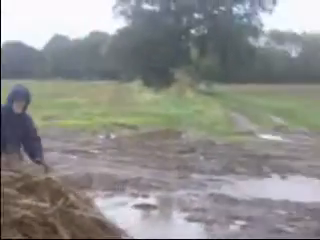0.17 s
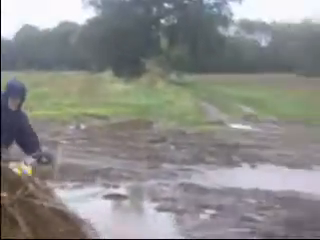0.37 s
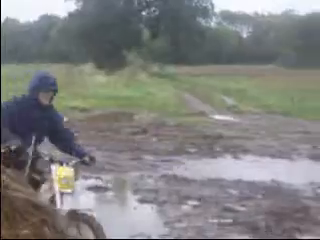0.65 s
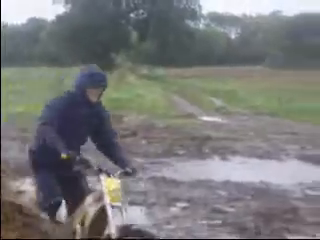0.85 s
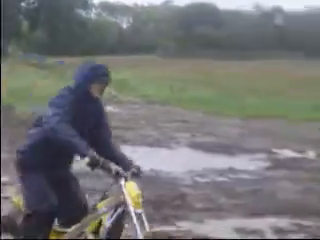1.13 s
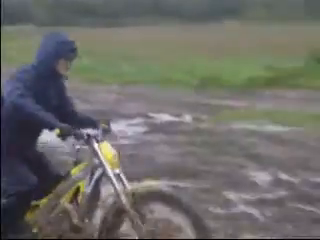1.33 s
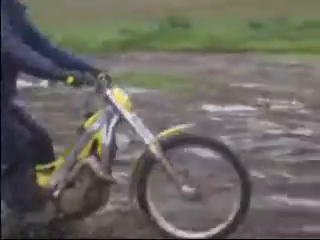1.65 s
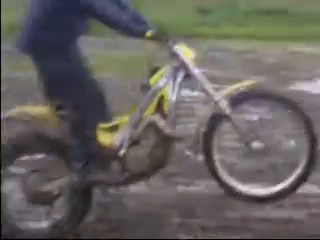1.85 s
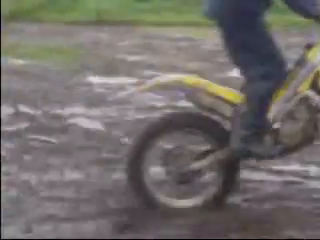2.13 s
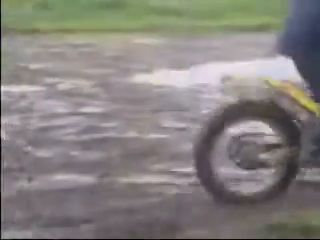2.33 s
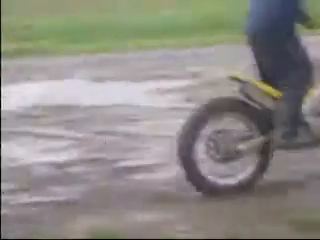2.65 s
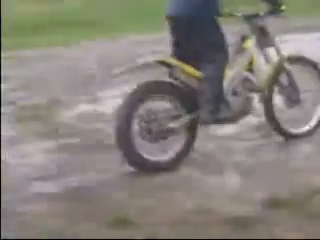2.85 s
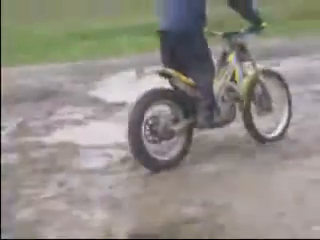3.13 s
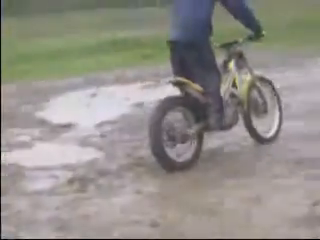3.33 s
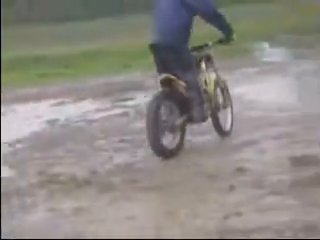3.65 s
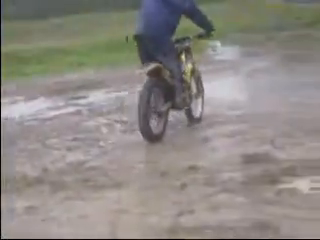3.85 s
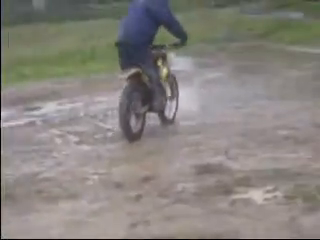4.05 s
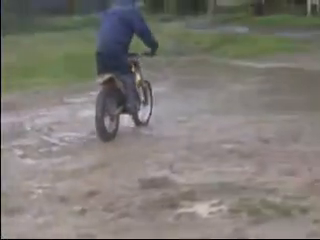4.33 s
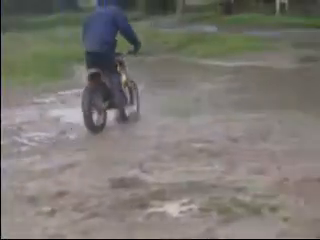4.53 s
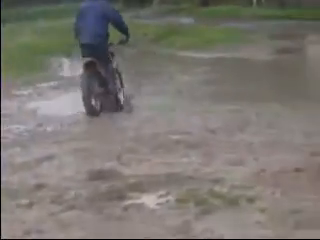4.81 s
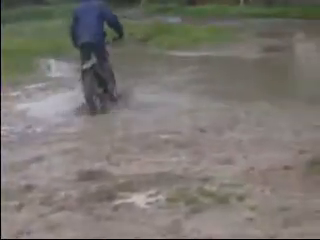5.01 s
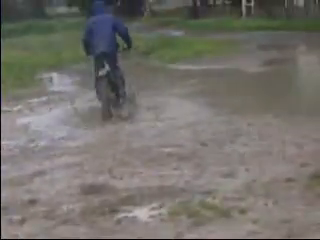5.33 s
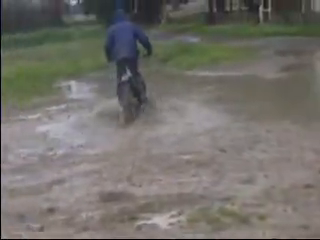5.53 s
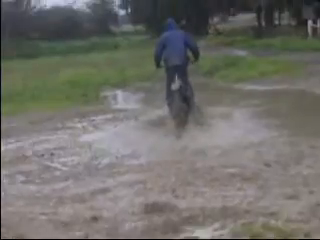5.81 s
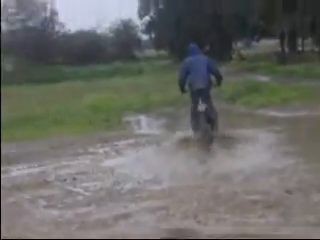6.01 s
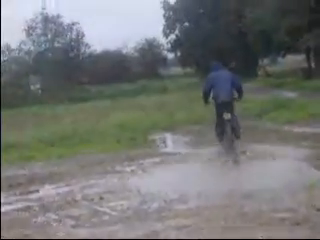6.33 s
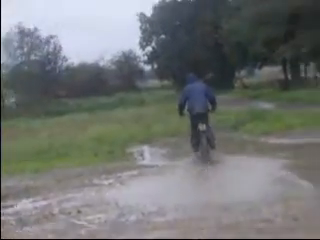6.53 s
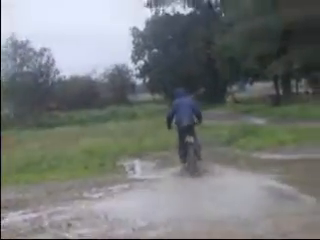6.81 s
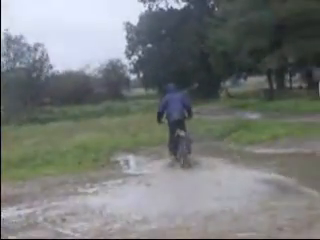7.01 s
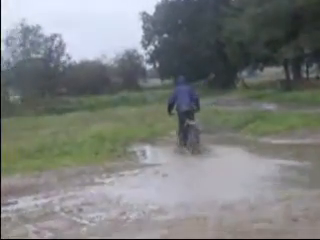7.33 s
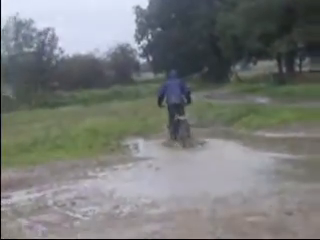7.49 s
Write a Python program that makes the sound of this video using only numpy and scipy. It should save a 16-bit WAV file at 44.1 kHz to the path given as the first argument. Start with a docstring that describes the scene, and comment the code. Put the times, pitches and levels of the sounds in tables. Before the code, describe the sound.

Outdoors on muddy open ground, a small two-stroke motorcycle approaches with a buzzy, hollow exhaust bark, eases briefly, then cracks open and revs harder as it passes very close, wet tyres hissing. The throttle shuts and heavy wind thumps, crackles and whistles over the microphone, overloading it. Farther away the engine pops sparsely, ticks over quickly through a faintly splashing puddle, then gives a few last pops.

```python
"""On windy, muddy open ground, a two-stroke trials motorcycle passes close by with two pulls of the throttle.
Each firing sends a pressure pulse that rings the pipe, with a rasp of gas; wet tyres hiss as filtered noise.
It coasts away with scattered pops and pings, fords a puddle and ticks over for a while.
Wind noise swells in gusts, and single eddies and wavering whistles strike the microphone and overload it."""
import sys
import numpy as np
from scipy import signal
from scipy.fft import rfft, irfft, next_fast_len
from scipy.io import wavfile
from scipy.ndimage import uniform_filter1d, map_coordinates

SR = 44100
rng = np.random.default_rng(int(sys.argv[2]) if len(sys.argv) > 2 else 0)


def bounce(signal):
    """Save signal as a 16-bit WAV file at the path given by the first command-line argument."""
    frames = np.transpose(np.atleast_2d(signal))
    limited = np.clip(frames, -1, 1)
    pcm = np.round(limited * 32767).astype(np.int16)
    wavfile.write(sys.argv[1], SR, pcm)


N = 337585  # length [samples]

# How fast the engine fires under throttle: (time [s], firings per second [Hz])
ENGINE_SPEED = [(0.0, 35.6), (0.09, 50.8), (0.17, 57.3), (0.25, 65.5), (0.32, 56.1), (0.39, 52.4),
                (0.47, 53.5), (0.58, 50.7), (0.65, 53.0), (0.76, 49.1), (0.83, 53.2), (0.92, 57.1),
                (1.01, 55.0), (1.14, 64.1), (1.2, 54.6), (1.31, 52.3), (1.56, 44.4), (1.61, 49.3),
                (1.675, 62.1), (1.73, 53.1), (1.79, 50.6), (1.9, 54.7), (1.99, 56.0), (2.08, 59.1),
                (2.16, 64.6), (2.23, 73.9), (2.33, 68.2), (2.6, 61.3)]
# Tone of the exhaust silencer: (frequency [Hz], relative level [dB])
EXHAUST_COLOUR = [(20, -23), (55, 10.5), (110, 3), (200, 4.5), (280, 3), (335, -9), (390, -13),
                  (470, -11.5), (610, -6.5), (740, -16), (1000, -35), (1500, -54), (5000, -100)]
# Tone of the gas jet: (frequency [Hz], relative level [dB])
RASP_COLOUR = [(400, -29.5), (950, 11), (1200, 0), (1350, 2.5), (1620, -7), (1880, 5), (2150, -2.5),
               (2480, 6), (2900, -4), (3250, 3), (3900, -1.5), (5000, -0.5), (8000, -5), (13000, -7)]
# Pulls of the throttle, levels at their end and at cruising revs:
# (opens [s], closes [s], exhaust [dB], bark [dB], rasp [dB])
THROTTLE_PULLS = [(-.1, 1.084, -17, -26.5, -42), (1.546, 2.234, -17.5, -24.5, -32)]
# Levels with the throttle eased, at cruising revs: (exhaust [dB], bark [dB], rasp [dB])
EASED_LEVELS = (-29.5, -42, -39)
# The grip keeps opening through a pull: (exhaust [dB/s], bark [dB/s], rasp [dB/s])
PULL_GROWTH = (2.8, 10.7, 1.6)
# The two main pipe tones drift as the bike goes by, levels before scatter:
# (time [s], lower tone [Hz], its level [dB], upper tone [Hz], its level [dB])
MAIN_BARK_TONES = [(.2, 626, -7, 880, -4), (.5, 584, 3, 868, -9), (.8, 576, -2, 890, -7.5),
                   (1.03, 675, 1, 886, -8.5), (1.3, 765, 2, 970, -2), (1.62, 440, -2, 780, 4),
                   (1.69, 500, -8, 930, -1), (1.79, 706, 6.5, 800, -6), (1.87, 650, 5, 850, 0.5),
                   (1.97, 590, 3, 854, 1), (2.08, 620, 6.5, 880, -4), (2.18, 642, -0.5, 976, -9)]
# Steady pipe tones beside them, levels before scatter: (frequency [Hz], level [dB], time to fall 60 dB [s])
STEADY_BARK_TONES = [(488, -5.5, 0.022), (1004, -14.5, 0.05), (1320, -23, 0.089), (1880, -18.5, 0.051),
                     (2400, -34, 0.033)]
OPEN_S, CLOSE_S = 0.027, 0.17  # twist of the grip
SHUT_S, SHUT_FADE_S = 2.32, 0.37  # the throttle is shut
REV_DB_PER_OCTAVE, RASP_DB_PER_OCTAVE = 1.5, 18.5  # growth with the revs
CRUISE_HZ = 56.6  # firings per second at which the throttle levels hold
BARK_T60_S = 0.034  # main pipe tones: time to fall 60 dB
BARK_SCATTER_DB = 0.8  # spread of each pipe tone from firing to firing
RASP_EDGE = 0.8  # a firing's sharp edge in the rasp, relative to the rush of gas

PASS_S, CLOSEST_M, RIDE_M_PER_S = 1.74, 1.46, 3.2  # the ride past the microphone
HEAP_DB, HEAP_CLEAR_S, HEAP_FADE_S = -4, 0.82, 0.36  # a straw heap screens the bike until it comes out

# The first firing of the second pull leaves as a shock: (time [s], peak [dB], width [s])
BANG_SHOCK = (1.5776, -9.5, 0.00012)
# Single firings: (time [s], ping of the pipe [dB], pop [dB])
SINGLE_FIRINGS = [(1.5757, -10.5, -15), (3.0365, -18, -34), (3.1227, -17.5, -11), (3.2089, -22.5, -18),
                  (4.4697, -25.5, -15), (4.8912, -20.5, -12.5), (4.9612, -20, -9), (5.026, -22.5, -10.5),
                  (5.0905, -26.5, -12), (5.175, -30, -20), (5.246, -25.5, -16), (5.3604, -28, -14.5),
                  (5.4285, -27.5, -9.5), (5.5399, -50, -14.5), (5.5912, -37, -14.5), (5.6373, -32, -12.5),
                  (6.5751, -42, -18.5), (6.6, -36, -18.5), (6.6426, -34, -12.5), (7.007, -28, -11),
                  (7.0674, -36, -27), (7.2754, -35, -14.5), (7.349, -30.5, -11.5), (7.427, -37, -18),
                  (7.5738, -33, -19)]
# The engine ticks over, levels before scatter: (time [s], firings per second [Hz], ping [dB], pop [dB])
IDLE_FIRINGS = [(5.7066, 20.3, -34, -13), (5.78, 20.6, -28, -11.5), (5.85, 22.3, -30, -11.5),
                (5.94, 22.1, -20.5, -9.5), (5.99, 22, -32, -12), (6.05, 21.9, -36, -14.5),
                (6.12, 20.2, -41, -12.5), (6.22, 21.0, -28.5, -12.5), (6.57, 21.25, -27.5, -11)]
# The pressure wave and its inverted returns: (delay [s], size relative to the pop, width [s])
PIPE_RETURNS = [(.00055, 1.05, .00043), (.0018, -.55, .00037), (.0026, -.33, .0004), (.0032, -.78, .00048)]
# The intake gulps after each single or idle firing: (delay [s], size relative to the pop, width [s])
INTAKE_GULP = (.029, -.22, .0015)
# Ring of the pipe's steel wall: (frequency [Hz], gain [dB])
PIPE_WALL_COLOUR = [(600, -59), (1450, -12.5), (1850, 3), (2200, -3), (2500, -3), (2950, -7), (3400, -11.5),
                    (4000, -11), (4900, -11.5), (6200, -16), (9000, -20), (13000, -25)]
# Sound straight from the pipe's mouth: (frequency [Hz], gain [dB])
MOUTH_COLOUR = [(800, -49), (2200, -0.5), (3500, 1.5), (7000, -6.5), (10000, -7), (13000, -10)]
IDLE_SCATTER_DB = 0.7
CRACK_DB = 17  # shock front of a firing, relative to its ping
MOUTH_DB = 14.5  # the pipe's mouth, heard once the bike has passed; also scaled by nearness squared

# Tone of the tyre spray: (frequency [Hz], relative level [dB])
SPRAY_COLOUR = [(600, 4.5), (1620, -1.5), (1860, 5.5), (2150, 4), (2450, 2), (2880, -0.5), (3250, 0.5),
                (3900, -1.5), (5100, 0), (6500, -4.5), (9000, -6.5), (13000, -8.5)]
# Tone of the chain, crankcase and churned water: (frequency [Hz], relative level [dB])
CLATTER_COLOUR = [(100, -11), (230, -31), (400, 2), (740, 17.5), (1000, 9), (1190, 1), (1340, -2),
                  (1600, -25), (1900, -19), (2400, 1), (2900, -38), (5000, -36)]
SPRAY_DB, CLATTER_DB = -33.5, -44.5  # at the closest point, before random wavering
SPRAY_FALLS = 1.254  # spray fades with this power of the screened nearness
FORD_S, FORD_END_S, FORD_RISE_S, FORD_FALL_S = 4.92, 6.36, 0.53, 2.1  # through the puddle
FORD_SPRAY_DB, SLOSH_DB = -49.5, -52  # splash and churned water there, before random wavering
# A sheet of thrown water slaps down: (time [s], spread [s], level [dB])
WATER_SLAP = (6.65, 0.022, -43)
# Tone of that slap: (frequency [Hz], relative level [dB])
WATER_SLAP_COLOUR = [(700, -22), (1400, -3), (1600, 0), (2000, -9), (5000, -21)]
# Loose metal on the frame: (frequency [Hz], level before its rise and decay [dB])
CLINK_TONES = [(1900, -21), (2340, -20)]

# Wind over the microphone: (time [s], strength [dB])
WIND_STRENGTH = [(0, -19.5), (.35, -30.5), (.5, -30), (1.2, -29.5), (1.4, -28), (1.65, -25), (2.1, -25),
                 (2.37, -24.5), (2.7, -21), (3.4, -19.5), (3.9, -21), (4.4, -20), (5.05, -21), (5.6, -24),
                 (5.85, -28.5), (6.68, -27), (6.8, -20), (7.35, -23), (7.65, -20.5)]
# Gusts, levels before random wavering: (time [s], spread [s], buffeting [dB], flutter [dB], tearing [dB])
WIND_GUSTS = [(0.022, 0.07, -23, -40, -39), (0.376, 0.04, -16.5, -27.5, -52),
              (2.246, 0.042, -11, -22, -19.5), (2.475, 0.029, -14.5, -12.5, -35),
              (2.784, 0.074, -14, -24, -33.5), (2.999, 0.041, -11, -22, -29),
              (3.212, 0.062, -15.5, -14.5, -29), (3.548, 0.017, -11, -12, -31.5),
              (3.66, 0.022, -18, -15.5, -28), (3.868, 0.028, -20, -12, -37),
              (3.998, 0.056, -26, -16.5, -37), (4.3, 0.056, -39, -40, -23.5),
              (4.553, 0.043, -17, -17, -23.5), (4.827, 0.024, -14, -35, -28), (5.212, 0.085, -39, -38, -26),
              (5.305, 0.018, -35, -35, -35), (5.438, 0.012, -11, -20, -39),
              (6.093, 0.051, -18.5, -23.5, -42), (6.896, 0.094, -41, -35, -36),
              (7.102, 0.07, -30, -32, -33), (7.265, 0.049, -42, -24, -32), (7.47, 0.087, -23, -24.5, -44),
              (7.648, 0.028, -17, -33, -25)]
# Tone of the slow eddies: (frequency [Hz], relative level [dB])
RUMBLE_COLOUR = [(8, -29.5), (20, 8), (35, -2), (60, -6.5), (100, -18), (200, -31), (500, -58),
                 (1500, -112)]
# Tone of the faster air: (frequency [Hz], relative level [dB])
FLUTTER_COLOUR = [(30, -7), (60, 4), (100, 4), (190, -3.5), (300, -14.5), (500, -33), (1000, -37),
                  (3000, -68)]
# Tone of the torn air: (frequency [Hz], relative level [dB])
TEARING_COLOUR = [(80, -1.5), (200, 7), (350, 2.5), (550, -0.5), (900, -13), (1400, -36), (2200, -66),
                  (4000, -54), (9000, -84)]
BREEZE_DB = -21.5  # a middling wind, at which the layers have these levels before wavering and gusts:
RUMBLE_DB, FLUTTER_DB, TEARING_DB = -21.5, -23, -39
RUMBLE_GROWS, FLUTTER_GROWS, TEARING_GROWS = 0.99, 1.45, 0.4  # dB per dB of wind
# Small vortices shed at the microphone port; their level is relative to the tearing
VORTEX_PER_S, VORTEX_S, VORTEX_DB = 170, 0.00078, -5
# Single eddies that hit the port: (time [s], puff [dB], puff spread [s], suction [dB], suction width [s])
PORT_EDDIES = [(1.36, -51, .0072, -10, 0.0065), (2.217, -20, 0.005, -9, 0.0027),
               (2.233, -18, 0.0047, -11, 0.0028), (2.256, -26, .001, -1, 0.0043),
               (2.261, -10.5, 0.0066, -17, 0.0016), (2.469, -27, 0.0082, -10, 0.0095),
               (2.663, -21, .0018, -8, .0052), (2.717, -21, .0012, -22, .003),
               (2.736, -24, .0014, -20, .004), (2.772, -25, .002, -20, .003), (2.815, -19, .003, -9, .0017),
               (2.871, -24, .0027, -20, .003), (2.996, -19, .003, -5.5, .0042),
               (3.022, -32, .002, -2, .0049), (3.271, -23, .0044, -15, .0026),
               (3.59, -27, .0025, -5.5, .0043), (3.677, -16, .006, -13, .003),
               (3.741, -18, .0021, -4.5, .0058), (3.781, -24, .002, -6, .0055),
               (3.926, -28, .001, -20, .0049), (4.013, -19.5, .001, -8, .0038),
               (4.163, -15, .0021, -2.5, .0041), (4.251, -19.5, 0.0036, -17, .0015),
               (4.268, -19.5, 0.0024, -14, 0.0018), (4.295, -22, 0.0014, -18, .0015),
               (4.325, -25, 0.021, -25, .0055), (4.386, -18, 0.0013, -15, 0.0018),
               (4.546, -25, .002, -7, 0.003), (4.603, -20.5, 0.0097, -16, 0.0013),
               (4.627, -10, 0.0005, -12, 0.0014), (4.644, -17.5, 0.01, -16, 0.0019),
               (4.659, -13, 0.0018, -21, 0.0012), (4.679, -18.5, .012, -18, 0.0016),
               (4.69, -35, .002, -13, 0.0024), (4.701, -14, 0.0013, -7.5, 0.0013),
               (4.715, -25, 0.0025, -14.5, 0.0013), (4.732, -19.5, 0.019, -41, .0055),
               (4.777, -18, 0.0012, -23, 0.0011), (4.804, -23, 0.018, -22, .003),
               (5.118, -10, 0.0065, -26, .0064), (7.081, -27, 0.0015, -15, 0.00091),
               (7.128, -25.5, .0015, -25, 0.002), (7.153, -40, .0016, -4.5, 0.0014),
               (7.537, -28, .0026, -3, .003), (7.598, -14.5, .002, -13, .0022)]
# Tone of the puffs: (frequency [Hz], relative level [dB])
PUFF_COLOUR = [(60, -15), (200, 7.5), (450, 1.5), (750, -1.5), (1100, -9.5), (1600, -18), (2200, -28),
               (3000, -38.5), (9000, -57)]
# Tones at the port's edge, one list each, levels before flicker:
# (time [s], frequency [Hz], level [dB], and for low tones the level of their overtones [dB])
EDGE_TONES = [
    [(3.84, 6400, -57), (4, 6580, -46.5), (4.18, 6520, -58), (4.235, 6560, -47), (4.252, 6840, -43),
     (4.29, 6460, -56)],
    [(4.535, 1300, -40, -62), (4.555, 1520, -37, -58), (4.575, 1700, -42, -44), (4.592, 1770, -54, -47)],
    [(4.58, 7750, -64), (4.625, 7050, -47), (4.67, 7520, -49), (4.71, 6490, -58), (4.745, 6400, -51),
     (4.8, 6700, -60)],
    [(5.16, 7700, -51), (5.27, 7200, -57), (5.44, 7100, -54)],
    [(5.125, 1143, -39, -61), (5.15, 1190, -31, -59), (5.168, 1440, -41, -54), (5.2, 1540, -53, -50),
     (5.255, 1510, -51, -55), (5.282, 1294, -35, -48), (5.32, 1204, -34, -47.5), (5.395, 1162, -38, -50),
     (5.445, 1040, -53, -62)],
]
# Overtones of the low edge tones: (multiple of the frequency, level relative to that overtone level [dB])
EDGE_OVERTONES = [(2, -5), (3, -12), (4, -14)]
# Tone of the steady hiss: (frequency [Hz], relative level [dB])
HISS_COLOUR = [(1000, 16), (5000, -0.5), (13000, -3)]
HISS_DB = -53
TOP_HZ = 13000  # upper limit of the recorded sound


def engine(scatter_db=-2.04, jet_decay=0.28, jet_floor=1.0, edge_hz=3000):
    """One pressure pulse a turn leaves the silencer and rings the pipe in a bark; rushing gas adds a rasp."""
    exhaust, bark, rasp = throttle()
    near, screened = passing()
    turns = np.cumsum(curves(ENGINE_SPEED)[0]) / SR + 0.0015 * wobble(45)  # slightly uneven turning
    pulses = np.diff(np.floor(turns), prepend=0) * amp(scatter_db * rng.standard_normal(N))

    t = np.arange(SR // 16) / SR
    pipe = np.zeros(N)
    low_hz, low_db, high_hz, high_db = curves(MAIN_BARK_TONES)
    for i in np.flatnonzero(pulses):
        main = [(low_hz[i], low_db[i], BARK_T60_S), (high_hz[i], high_db[i], BARK_T60_S)]
        hz, db, t60 = np.transpose(main + list(STEADY_BARK_TONES))[:, :, None]
        db = db + BARK_SCATTER_DB * rng.standard_normal(db.shape)
        rings = amp(db - 60 * t / t60) * np.sin(2 * np.pi * hz * t)
        add(pipe, i / SR, pulses[i] * np.sum(rings, axis=0))

    # The gas rushes hardest at the start of each turn
    rush = unit((jet_floor + np.exp(-(turns % 1) / jet_decay)) * rng.standard_normal(N))
    edge = unit(filtered(pulses, lambda hz: 1 / (1 + 1j * hz / edge_hz) ** 2))
    jet = unit(coloured(rush + RASP_EDGE * edge, RASP_COLOUR))
    body = exhaust * unit(coloured(pulses, EXHAUST_COLOUR)) + bark * unit(pipe)
    return near * body + screened * rasp * jet


def throttle():
    """Strength of the exhaust, its bark and its rasp: all rise with each pull and with the revs."""
    t = np.arange(N) / SR
    octaves = np.log2(curves(ENGINE_SPEED)[0] / CRUISE_HZ)
    levels = amp(EASED_LEVELS)[:, None] * held(-1, SHUT_S, OPEN_S, SHUT_FADE_S)
    for opens, closes, *db in THROTTLE_PULLS:
        pull = amp(np.array(db)[:, None] + np.outer(PULL_GROWTH, np.minimum(t - closes, 0)))
        levels = np.maximum(levels, pull * held(opens, closes, OPEN_S, CLOSE_S))
    growth = [REV_DB_PER_OCTAVE, REV_DB_PER_OCTAVE, RASP_DB_PER_OCTAVE]
    return levels * amp(np.outer(growth, octaves))


def passing():
    """Gain falling with the bike's distance, and the same lowered while the straw heap screens it."""
    t = np.arange(N) / SR
    near = CLOSEST_M / np.hypot(CLOSEST_M, RIDE_M_PER_S * (t - PASS_S))
    behind_heap = np.clip((HEAP_CLEAR_S - t) / HEAP_FADE_S, 0, 1)
    return near, near * amp(HEAP_DB * behind_heap)


def bang():
    """The unburnt charge goes off in one sharp crack, a single brief pressure peak, as the throttle opens."""
    s, db, width = BANG_SHOCK
    return amp(db) * np.exp(-.5 * ((np.arange(N) / SR - s) / width) ** 2)


def overrun(ping_t60=0.03, box_hz=195, box_t60=0.75, box_db=-21, lag=0.00073):
    """Each firing pops, returns from the pipe's cones, makes the intake gulp and pings the steel wall."""
    t = np.arange(SR // 10) / SR
    wave = sum(size * np.exp(-.5 * ((t - lag - s) / width) ** 2)
               for s, size, width in [*PIPE_RETURNS, INTAKE_GULP])
    # The silencer box rings on, until the end of this 0.1 s sound
    box = amp(box_db - 60 * t / box_t60) * (1 - np.exp(-t * box_hz))
    pops, knocks = np.zeros(N), np.zeros(N)
    for s, ping_db, pop_db in list(SINGLE_FIRINGS) + tick_over():
        box_ring = box * np.sin(2 * np.pi * (box_hz * t + rng.random()))
        add(pops, s, amp(pop_db) * (wave + box_ring))
        add(knocks, s, amp(ping_db - 60 * t / ping_t60) * rng.laplace(size=len(t)))
        add(knocks, s + lag, amp([ping_db + CRACK_DB]))  # the shock front strikes the wall
    facing = passing()[0] ** 2 * (np.arange(N) / SR > PASS_S)
    mouth = amp(MOUTH_DB) * facing * coloured(knocks, MOUTH_COLOUR)
    return pops + coloured(knocks, PIPE_WALL_COLOUR) + mouth


def tick_over():
    """One firing a turn while the engine idles: rows of (time [s], ping [dB], pop [dB])."""
    s, rate, ping_db, pop_db = np.transpose(IDLE_FIRINGS)
    t = np.arange(s[0], s[-1], 1 / SR)
    turns = np.cumsum(np.interp(t, s, rate)) / SR
    times = np.interp(np.arange(turns[-1]), turns, t)  # one time for each whole turn
    scatter = IDLE_SCATTER_DB * rng.standard_normal((len(times), 2))
    pings = np.interp(times, s, ping_db) + scatter[:, 0]
    pops = np.interp(times, s, pop_db) + scatter[:, 1]
    return list(zip(times, pings, pops))


def wheels(drop_rate=500, drop_db=-9, rattle_db=4.5, spatter_db=1.5):
    """Wet tyres hiss with spray and single drops, more in the puddle; chain and crankcase clatter."""
    screened = passing()[1]
    ford = held(FORD_S, FORD_END_S, FORD_RISE_S, FORD_FALL_S)
    drops = (rng.random(N) < drop_rate / SR) * rng.standard_normal(N)
    spray = unit(coloured(rng.standard_normal(N) + amp(drop_db) * unit(drops), SPRAY_COLOUR))
    spray_level = np.hypot(amp(SPRAY_DB) * screened ** SPRAY_FALLS, amp(FORD_SPRAY_DB) * ford)
    spray = spray * spray_level * amp(spatter_db * wobble(40))
    clatter_level = np.hypot(amp(CLATTER_DB) * screened, amp(SLOSH_DB) * ford)
    clatter = clatter_level * amp(rattle_db * wobble(120))
    return spray + clatter * noise(CLATTER_COLOUR)


def slap():
    """Water thrown by the rear tyre falls back into the puddle: one short swell of filtered noise."""
    s, length, db = WATER_SLAP
    swell = np.exp(-.5 * ((np.arange(N) / SR - s) / length) ** 2)
    return amp(db) * swell * noise(WATER_SLAP_COLOUR)


def clink(s=1.329, t60=0.023, rise=0.0033):
    """Something loose on the frame rings once, in fading pure tones, as the bike dips."""
    t, out = np.arange(SR // 8) / SR, np.zeros(N)
    ring = sum(amp(db) * np.sin(2 * np.pi * hz * t) for hz, db in CLINK_TONES)
    add(out, s, ring * amp(-60 * t / t60) * (1 - np.exp(-t / rise)))
    return out


def wind(surge_db=3.0, surge_rate=9):
    """Slow eddies rumble; faster air flutters and tears into crackling vortices, and gusts swell each."""
    t = np.arange(N) / SR
    over_db = curves(WIND_STRENGTH)[0] - BREEZE_DB
    buffet, flap, tear = sum(np.outer(amp(db), np.exp(-.5 * ((t - s) / length) ** 2))
                             for s, length, *db in WIND_GUSTS)
    rumble_db = RUMBLE_DB + RUMBLE_GROWS * over_db + surge_db * wobble(surge_rate)
    rumble = noise(RUMBLE_COLOUR) * np.hypot(amp(rumble_db), buffet)
    flutter = noise(FLUTTER_COLOUR) * np.hypot(amp(FLUTTER_DB + FLUTTER_GROWS * over_db), flap)
    torn = noise(TEARING_COLOUR) * amp(3.5 * wobble(260)) + amp(VORTEX_DB) * vortices()
    tearing = torn * np.hypot(amp(TEARING_DB + TEARING_GROWS * over_db), tear)
    return rumble + amp(1.8 * wobble(60)) * (flutter + tearing)


def vortices():
    """A dense train of sharp little dips in pressure, rms 1."""
    kicks = (rng.random(N) < VORTEX_PER_S / SR) * rng.random(N)
    u = np.arange(-SR // 100, SR // 100) / SR / VORTEX_S
    return unit(signal.fftconvolve(kicks, (u * u - 1) * np.exp(-u * u / 2), mode="same"))


def eddies(lead=0.5, crackle_db=2):
    """An eddy pushes the diaphragm, sucks it back and breaks up in a crackling puff."""
    t = np.arange(-SR // 10, SR // 10) / SR
    puffs, suction = np.zeros(N), np.zeros(N)
    for s, puff_db, length, suction_db, width in PORT_EDDIES:
        u = t / width - lead
        add(puffs, s + t[0], amp(puff_db) * np.exp(-.5 * (t / length) ** 2))
        # A low-pressure core between two rims
        add(suction, s + t[0], amp(suction_db) * (u * u - 1) * np.exp(-u * u / 2))
    return puffs * unit(noise(PUFF_COLOUR) * amp(crackle_db * wobble(300))) + suction


def whistles(waver=0.0074, flicker_db=3.0):
    """Air across the port's edge sings in wavering tones; the low ones carry overtones that come and go."""
    t, out = np.arange(N) / SR, np.zeros(N)
    for rows in EDGE_TONES:
        hz, db, *overtone_db = curves(rows)
        # Short ramps soften the start and end
        blowing = uniform_filter1d(1.0 * ((t > rows[0][0]) & (t < rows[-1][0])), size=400)
        phase = 2 * np.pi * np.cumsum(hz * (1 + waver * wobble(320))) / SR
        tone = amp(db) * np.sin(phase)
        if overtone_db:
            overtones = sum(amp(level + 4.5 * wobble(110)) * np.sin(k * phase + .5 * wobble(400))
                            for k, level in EDGE_OVERTONES)
            tone += amp(overtone_db[0]) * overtones
        out += blowing * amp(flicker_db * wobble(90)) * tone
    return out


def hiss():
    """A faint even hiss of filtered noise under everything."""
    return amp(HISS_DB) * noise(HISS_COLOUR)


def amp(db):
    """Turn decibels into a plain multiplier."""
    return 10 ** (np.asarray(db) / 20)


def unit(x):
    """Scale a sound to rms 1."""
    return x / np.sqrt(np.mean(x ** 2) + 1e-20)


def curves(rows):
    """One value per sample for each column after the time."""
    s, *cols = np.transpose(rows)
    return [np.interp(np.arange(N) / SR, s, c) for c in cols]


def wobble(rate):
    """A smooth random curve, rate knots a second."""
    knots = rng.standard_normal(int(N * rate / SR) + 4)
    return map_coordinates(knots, [np.arange(N) * rate / SR])


def held(start, end, rise, fall):
    """An envelope that rises from start, holds and falls from end."""
    t = np.arange(N) / SR
    return np.clip((t - start) / rise, 0, 1) * np.clip(1 - (t - end) / fall, 0, 1)


def filtered(x, response):
    """Filter x by a complex response of frequency."""
    m = 2 * next_fast_len(N // 2 + SR // 4)  # room for the filter to ring out
    return irfft(rfft(x, m) * response(np.fft.rfftfreq(m, 1 / SR)), m)[:N]


def coloured(x, points):
    """Filter x so its gain follows (frequency [Hz], gain [dB]) points, with no ringing ahead of the sound."""
    f, db = np.transpose(points)

    def response(hz):
        cepstrum = irfft(np.log(amp(np.interp(np.log(hz + 1), np.log(f), db))))
        half = len(cepstrum) // 2
        return np.exp(rfft(np.r_[cepstrum[0], 2 * cepstrum[1:half]], 2 * half))
    return filtered(x, response)


def noise(points):
    """Coloured noise of rms 1."""
    return unit(coloured(rng.standard_normal(N), points))


def add(track, s, sound):
    """Mix a sound into a track from time s."""
    part = track[max(round(s * SR), 0):][:len(sound)]
    part += sound[:len(part)]


def scene():
    """Mix the motorcycle, the water and the wind into one channel."""
    bike = engine() + bang() + overrun() + wheels() + slap() + clink()
    air = wind() + eddies() + whistles()
    return (bike + air + hiss())[None]


def record(dry):
    """The microphone blocks steady pressure and overloads softly; nothing above the band limit is kept."""
    top, hardness = 0.67, 8  # overload ceiling and how sharply it bends
    heard = filtered(dry[0], lambda hz: 1j * hz / (1j * hz + 8))
    clipped = heard / (1 + np.abs(heard / top) ** hardness) ** (1 / hardness)
    return filtered(clipped, lambda hz: hz < TOP_HZ)[None]


dry = scene()
out = record(dry)
bounce(out)
```